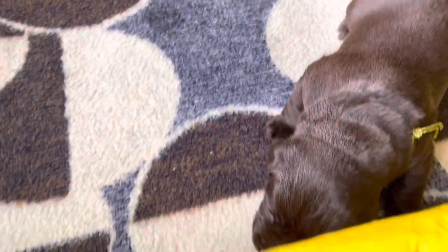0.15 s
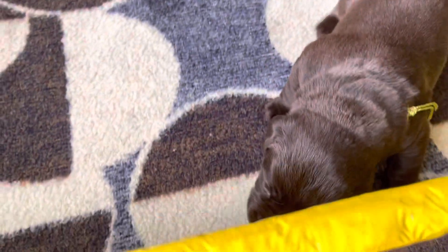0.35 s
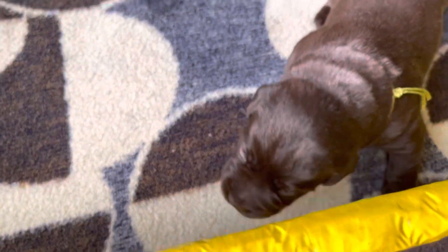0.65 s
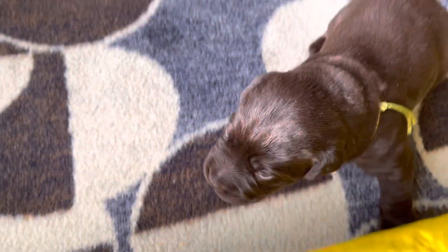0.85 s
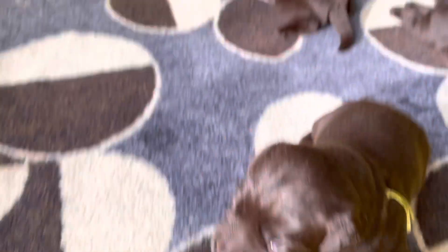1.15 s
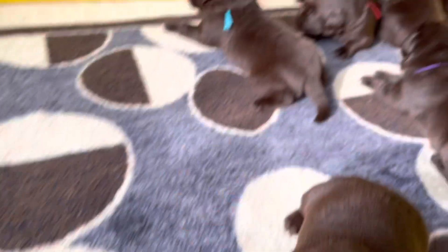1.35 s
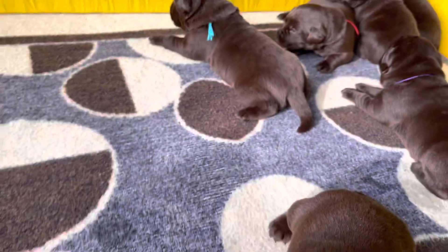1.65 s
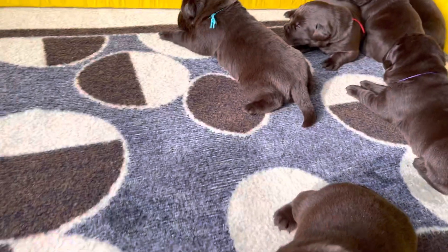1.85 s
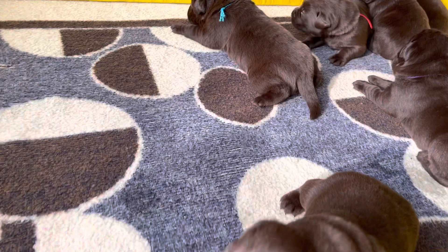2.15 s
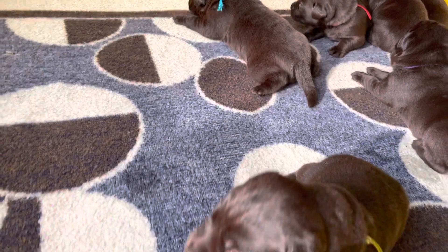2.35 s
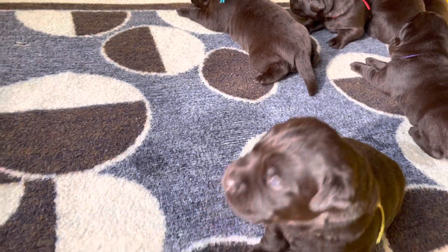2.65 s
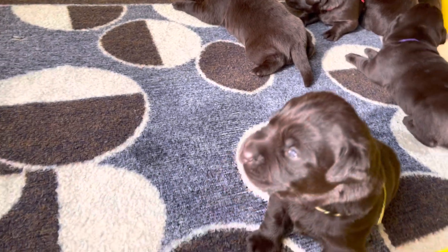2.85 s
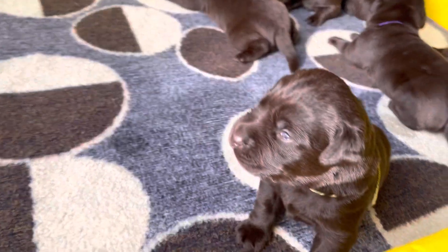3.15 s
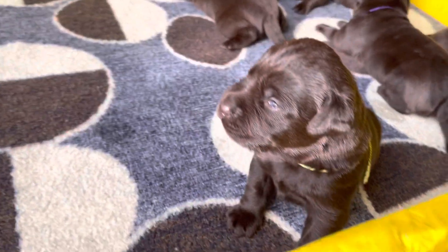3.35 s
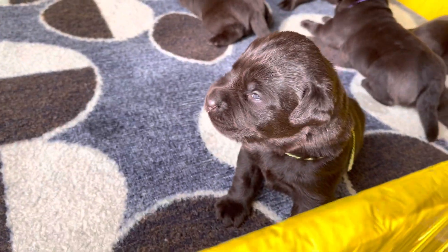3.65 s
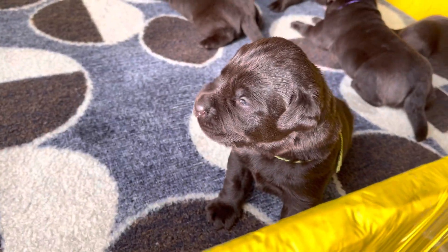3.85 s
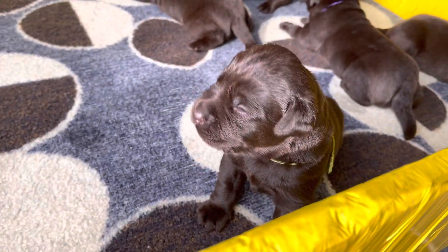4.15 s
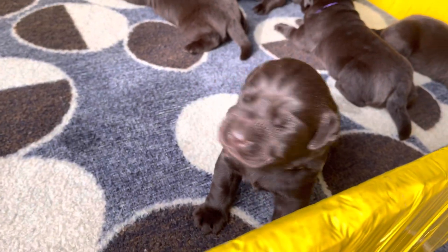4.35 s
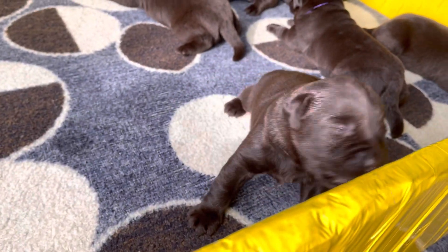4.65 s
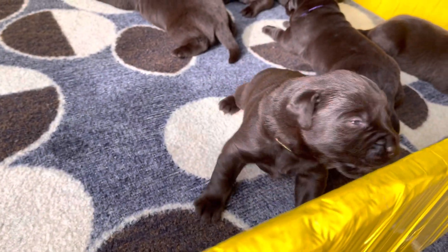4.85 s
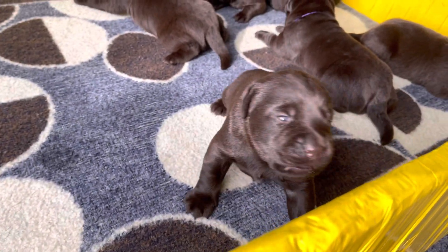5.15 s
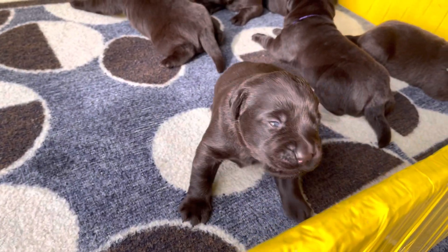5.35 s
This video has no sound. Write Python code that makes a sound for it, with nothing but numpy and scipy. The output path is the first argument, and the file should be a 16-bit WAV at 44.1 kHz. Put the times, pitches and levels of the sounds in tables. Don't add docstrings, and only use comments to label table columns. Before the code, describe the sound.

Very young puppies give trembling whines, short cries, a sharp bright yelp and arched squeaks, separated by soft creaky groans.

```python
import sys
import numpy as np
from scipy import signal
from scipy.fft import rfft, irfft
from scipy.io import wavfile
from scipy.ndimage import uniform_filter1d

SR = 44100
rng = np.random.default_rng(int(sys.argv[2]) if len(sys.argv) > 2 else 0)


def waveform_to_disk(signal):
    frames = np.transpose(np.atleast_2d(signal))
    scaled = np.clip(frames, -1, 1) * 32767
    samples = np.round(scaled).astype(np.int16)
    wavfile.write(sys.argv[1], SR, samples)


def gain_from_db(level_db):
    decades = np.asarray(level_db, float) / 20
    return 10 ** decades


N = 242991

# f/Hz, density/(dB per Hz)
ROOM_TONE = [(20, -48), (45, -11.5), (150, -16), (300, -20), (700, -28), (1300, -34), (2500, -35.5),
             (12000, -55.5)]
ROOM_TONE_DB = -71.5
# t/s, level/dB
RUMBLE = [
    (0.0, -91.5),
    (2.87, -60.5),
    (5.28, -87.5),
    (5.51, -73),
]

# t/s, f/Hz, level/dB, mouth opening as octave gain/dB
WHINES = [
    [(0.0, 1205, -47.5, -12.5), (0.03, 1298, -33, -36.5), (0.075, 1226, -27, -21.5)],
    [(0.18, 1176, -41, -9), (0.195, 1339, -30, -15.5), (0.3, 1288, -26.5, -22.5), (0.44, 1212, -25.5, -27),
     (0.55, 1159, -35, -9), (0.65, 1098, -34.5, -8.5), (0.675, 980, -44, 0.5), (0.72, 928, -50.5, 3)],
    [(2.862, 1545, -25.5, -4.5), (2.94, 1530, -24.5, -14.5), (2.995, 1394, -33, -6.5),
     (3.075, 1407, -31.5, -13), (3.14, 1489, -37.5, -20.5), (3.23, 1486, -39.5, -21.5),
     (3.36, 1349, -33.5, -11.5), (3.43, 1290, -38.5, -5.5), (3.485, 1188, -38, -9)],
    [(4.79, 608, -44, -8), (4.95, 565.3, -31.5, -11), (5.03, 535.3, -38, -2), (5.1, 577.4, -35.5, 0),
     (5.2, 599.3, -42, 2), (5.29, 608.5, -39, 4.5), (5.38, 593.7, -31.5, -5), (5.43, 533.4, -36.5, -6.5),
     (5.46, 448, -39.5, 0.5), (5.53, 480.4, -32.5, 2.4)],
]
# rate/Hz, depth/share of f, crest t/s, throb/dB, slowing/(Hz per s)
WHINE_TREMBLE = [(22.5, 0.0049, 0.047, -3.5, .1), (22.87, 0.028, .246, 2, 13.7),
                 (23.57, 0.028, 3.012, 2.5, 9.4), (22.41, 0.035, 5.292, -1.5, 8.6)]
WHINE_JITTER = [.006, .005, .008, .004]
# left-right/dB, upper partials/dB, twelfth over them/dB, dulling/(dB per s), air/dB
WHINE_VOICE = [(-4.8, -8, -2.3, 3.5, -8), (0.55, -7, -0.8, 27, -12.5), (0.5, -18.5, 2, 19.5, -2.5),
               (1, -33.5, 17.5, -14, -10)]
# f/Hz, gain/dB
MOUTH = [(1200, 8), (2400, 3), (3300, 0), (4700, -4.5), (5600, -0.5), (7500, 5.5), (9300, -4), (10200, 1),
         (11000, -9), (12300, -17)]
# f/Hz, gain/dB
NASAL = [(1200, 6), (2400, 1), (3100, -10), (4200, -9.5), (5000, -21.5), (5900, -5), (7000, 1), (9500, 2.5),
         (10500, 0), (12300, -27)]
# f/Hz, density/(dB per Hz)
RASP = [(300, -73.5), (1000, -22.5), (2200, -9), (2900, -39.5), (4500, -16.5), (6000, -26), (7200, -13),
        (9000, -8), (10200, -17.5), (11200, -10.5), (13000, -37)]
FLUTTER_DB, GRAIN_DB, GUST_DB = 1.2, .8, 2
TOP_HZ = 11284

# t/s, f/Hz, level/dB, mouth opening/dB
CRIES = [
    [(0.012, 978.4, -41.5, -15.5), (0.05, 1136, -31, -25.5), (0.058, 1058, -34.5, 10.5),
     (0.07, 1131, -31, 7), (0.1, 1130, -38, 11), (0.155, 865.5, -26.5, -15), (0.17, 783.5, -29, -22.5),
     (0.185, 843, -51, -9)],
    [(0.352, 1060, -50.5, 5.5), (0.385, 1225, -46.5, -0.5), (0.425, 1190, -36.5, -2.5),
     (0.445, 989, -43, 1.5), (0.46, 863.6, -29, -7), (0.535, 832, -24, -17.5), (0.55, 810, -74.5, 18.5)],
    [(2.757, 1078, -51, -32.5), (2.78, 995.5, -39, 9.5), (2.809, 1068, -38.5, 19.5), (2.813, 1170, -32, 14),
     (2.821, 1460, -23.5, 8), (2.85, 1495, -27, 6.5), (2.87, 1550, -32.5, -4)],
    [(2.865, 1550, -40, -16.5), (2.88, 1600, -18.5, -26.5), (2.92, 1559, -28, -22), (3.0, 1596, -35, -31.5),
     (3.1, 1583, -49.5, -18.5), (3.3, 1504, -38.5, -41)],
    [(4.29, 1813, -65, -32), (4.33, 1870, -40, -29.5), (4.35, 1995, -42, -34), (4.362, 1922, -39, -24)],
]
# left-right/dB, upper partials/dB, twelfth/dB, dulling/(dB per s), air/dB
CRY_VOICE = [(1.6, -17, -6, 6.7, -3.5), (1.9, -18.5, 4, 73, -7.5), (1.2, -4, 9, 75, -5),
             (7.5, -21.5, 1.5, 10.5, -4.5), (0.15, -19, 7.5, 12, -1.5)]
CRY_JITTER = [.007, .006, .005, .016, .006]

# t/s, f/Hz, level/dB, mouth opening/dB
YELPS = [
    [(0.058, 1053, -34.5, 14), (0.068, 1031, -33.5, 11), (0.082, 745.7, -31.5, 12.5),
     (0.095, 743.7, -29.5, 8.5), (0.118, 867.4, -40, 23), (0.132, 873, -41.5, 16), (0.142, 1030, -30.5, 17),
     (0.16, 1129, -35.5, 13.5), (0.167, 1007, -31, 15), (0.188, 1040, -50.5, 25)],
    [(4.535, 1439, -32.5, -18), (4.56, 1634, -22.5, -18.5), (4.6, 1658, -21, -11.5),
     (4.636, 1763, -23, -5.5), (4.639, 1839, -11.5, -10.5), (4.67, 1887, -15, -11.5),
     (4.725, 1824, -17, -22.5), (4.748, 1547, -25, -29), (4.765, 1119, -49.5, 6.5)],
]
# left-right/dB, upper partials/dB, twelfth/dB, dulling/(dB per s), air/dB
YELP_VOICE = [(-.4, -12.5, -7.5, 79.5, -7.5), (1.1, -23, -1, -34.5, -4.5)]
# f/Hz, width/Hz, gain/dB
YELP_RING = [(2240, 420, 26), (5300, 330, 22.5)]
YELP_JITTER = [.011, .003]

# crest t/s, half length/s, f/Hz, glide/(Hz per s), level/dB
GRUNTS = [(1.231, 0.02, 316.8, 897.5, -34), (1.4, 0.026, 298, -1700, -41.5),
          (2.178, 0.014, 1037, -3000, -41.5), (2.877, .025, 343.8, 31, -36.5),
          (3.268, .023, 939, 5796, -38), (3.491, 0.033, 449, 22, -40), (3.863, 0.058, 127, -350, -44.5),
          (3.981, .036, 259.5, 1009, -38.5), (4.348, .018, 325.6, -100, -36), (4.766, .05, 318, 795, -48),
          (4.941, 0.067, 295.2, -1100, -38), (0.343, .005, 700, 26, -45.5), (0.498, .004, 1900, 33.5, -34),
          (3.365, .006, 1300, 35, -21.5), (4.574, .004, 1000, 34, -44), (2.407, 0.0033, 2146, 30, -57),
          (0.502, 0.013, 325, 23, -66), (3.848, 0.0039, 790, 30, -48.5), (3.939, .005, 706, 31.5, -44.5),
          (0.084, .02, 310, 29.5, -48), (0.164, .02, 320, 31.5, -52)]
# left-right/dB, upper partials/dB, twelfth/dB, dulling/(dB per s), air/dB
GRUNT_VOICE = (1, -30.5, 14.5, -4, -4.5)
# octave f/Hz, gain/dB
GRUNT_MOUTH = [(250, -16.5), (550, -5.5), (900, -8), (1900, -27.5)]
GRUNT_RISE_DB, GRUNT_FALL_DB = 16, 21

# t/s, f/Hz, level/dB, mouth opening/dB
SLIDES = [
    [(0.685, 894, -51, 3.5), (0.695, 769, -32.5, 7), (0.725, 653.7, -34.5, 2.5), (0.775, 582.4, -44, -4.5),
     (0.795, 475.5, -45.5, 4), (0.845, 427, -43, 6.5), (0.865, 378.7, -38.5, 7.5), (0.97, 273, -39.5, 4),
     (0.995, 256.8, -51.5, -15)],
    [(3.478, 1213, -49, 8), (3.5, 842.5, -41, -15.5), (3.51, 784, -24.5, -17.5), (3.555, 770, -28, -24),
     (3.572, 663, -25, -20.5), (3.605, 621.3, -29, -15.5), (3.65, 503, -35, -8.5), (3.685, 410, -47.5, 15)],
    [(0.715, 981, -57.5, 11), (0.755, 943.6, -51, 8.5), (0.795, 980, -46, 9), (0.82, 884.6, -49, 14),
     (0.85, 768, -40, 3.5), (0.862, 790, -35, -5.5), (0.91, 752.7, -40.5, 6.7), (0.935, 644, -34, -7.5),
     (0.95, 575.3, -33, -16.5), (0.975, 557, -42.5, -5)],
    [(4.362, 957, -46.5, 2), (4.385, 661, -38.5, -9.5), (4.41, 490, -41.5, -7.5)],
]
# rate/Hz, depth/share of f, crest t/s, throb/dB, slowing/(Hz per s)
SLIDE_TREMBLE = [(19.9, 0.021, .75, 2.2, 0.086), (22.37, 0.034, 3.9, 1.2, 0.069),
                 (21.7, 0.0058, 1.7, 0.33, .1), (22.1, 0.0037, 5.4, 0.26, 0.11)]
# left-right/dB, upper partials/dB, twelfth/dB, dulling/(dB per s), air/dB
SLIDE_VOICE = [(2.3, -43, 27.5, 1.5, -6.5), (0.79, -32, 18, 1.6, -7), (2.3, -9.5, -3.5, 57, -20),
               (2.5, -31, 21, 1.5, -3)]

# start t/s, crest t/s, end t/s, level/dB, drop to end/dB
GROANS = [(1.211, 1.228, 1.209, -15, 16), (1.386, 1.393, 1.38, -55, 21), (1.913, 1.973, 2.0046, -32.5, 11),
          (2.178, 2.266, 2.3384, -32.5, 3.5), (2.549, 2.644, 2.877, -35.5, 4.5),
          (3.276, 3.49, 3.77, -41.5, 17), (3.893, 4.226, 4.466, -44.5, 10.5),
          (4.613, 4.632, 5.2, -44.5, 37.5), (0.922, 0.95, 0.97, -41.5, 6), (3.821, 3.845, 3.9, -51, 7)]
# f/Hz, left-right/dB
GROAN_VOICE = [(900, 10.5), (814, 3), (770, 1), (790, 1), (738, 1.1), (810, 2.5), (746, 3), (725, 3.5),
               (1086, 1), (606, 3)]
# f/Hz, width/Hz, level/dB
THROAT = [(150, 62, -14.5), (331, 133, -6), (490, 147, -2.5), (770, 217, 1.5), (1195, 150, -6.5),
          (1550, 99, -22), (2120, 100, -26)]
GROAN_RISE_DB, BREATH_RISE_DB, BRUSH_RISE_DB = 6, 9, 9

# start t/s, crest t/s, end t/s, level/dB, drop to end/dB
BREATH = [(1.211, 1.224, 1.27, -59, 16.5), (1.445, 1.466, 1.53, -62.5, 13.5),
          (1.716, 1.744, 1.756, -64.5, 26), (1.915, 1.975, 2.06, -62.5, 7), (2.172, 2.283, 2.38, -54.5, 39),
          (2.547, 2.56, 2.7, -62, -7.5), (3.287, 3.613, 3.73, -57.5, 21), (3.935, 3.97, 4.8, -70.5, -8.5),
          (4.352, 4.372, 4.2, -45.5, 1.5), (5.217, 5.3, 5.39, -69, 3)]
# f/Hz, density/(dB per Hz)
NOSE = [(2500, -77.5), (4400, -38), (5600, -21.5), (6800, -24.5), (8700, -12), (9700, -14.5),
        (10200, -17.5), (10800, -19), (13000, -57.5)]

# start t/s, crest t/s, end t/s, level/dB, drop to end/dB
BRUSHES = [
    (1.451, 1.484, 1.53, -59.5, 4.5),
    (1.954, 1.995, 2.06, -60, 6),
    (3.48, 3.495, 3.56, -54, 12),
    (4.366, 4.39, 4.88, -66, 10.5),
]
# f/Hz, density/(dB per Hz)
PILE = [(500, -40), (1100, -2.5), (2200, -6), (4300, -13), (5500, -13), (9000, -26), (12000, -45)]

# t/s, level/dB
SQUEAKS = [
    [(4.163, -44.5), (4.215, -36), (4.285, -30.5), (4.34, -34), (4.352, -44)],
    [(4.91, -43.5), (4.97, -14), (5.0, -13.5), (5.045, -15), (5.1, -23), (5.14, -23), (5.225, -36.5)],
    [(5.385, -38.5), (5.42, -25), (5.445, -19), (5.53, -19)],
]
# top f/Hz, collapse t/s, fall time/s
ARCHES = [(1902, 4.364, 0.0094), (1822, 5.232, .04), (1700, 5.7, 0.039)]
# left-right/dB, upper partials/dB, twelfth/dB, dulling/(dB per s), air/dB
SQUEAK_VOICE = [(5.4, -1, -5, 1.2, -7.5), (0.12, -14, 1.5, 2, -4), (3, -22.5, 1.5, 1.5, -4)]
# f/Hz, width/Hz, gain/dB
SQUEAK_RING = (5600, 800, 4.2)
RISE_SHARE, RISE_S, FALL_SHARE = .38, .045, 0.67
SHUT_DB, OPEN_DB = -27, 38.5

# f/Hz, left lead/rad
PORTS = [(0, 0.32), (780, 0.9), (1890, 0.66), (2300, 1.87), (3100, 1.4), (4740, 1.11), (5860, 0.86),
         (7410, 1.46), (8790, 1.2), (12000, -8)]


def colour(x, points):
    hz, db = np.transpose(points)
    f_hz = np.maximum(np.fft.rfftfreq(x.shape[-1], 1 / SR), 1)
    gain = gain_from_db(np.interp(np.log(f_hz), np.log(hz), db))
    y = irfft(rfft(x) * gain, x.shape[-1])
    return y / np.sqrt(np.mean(y ** 2))


def walk(n, rate_hz):
    k = max(int(SR / rate_hz), 1)
    steps = np.repeat(rng.standard_normal(n // k + 1), k)
    return 1.526 * uniform_filter1d(uniform_filter1d(steps, k), k)[:n]


def read(table, fade_s=0.00069, release_s=0.0026):
    s, *columns = np.transpose(table)
    start = int(s[0] * SR)
    t = np.arange(start, min(int(s[-1] * SR), N)) / SR
    fade = np.clip(np.minimum((t - s[0]) / fade_s, (s[-1] - t) / release_s), 0, 1)
    return start, t, fade, [np.interp(t, s, c) for c in columns]


def swell_of(row, rise_db):
    start_s, crest_s, end_s, db, drop_db = row
    return [(start_s, db - rise_db), (crest_s, db), (end_s, db - drop_db)]


def add(out, start, x, pan_db):
    pan = np.array([pan_db + 0 * x, -pan_db + 0 * x])
    out[:, start:start + len(x)] += x * gain_from_db(pan / 2)


def house():
    mid, side = rng.standard_normal((2, N))
    tone = colour(np.array([mid + 0.27 * side, mid - 0.46 * side]), ROOM_TONE)
    tone = tone * gain_from_db(ROOM_TONE_DB + 3 * walk(N, 4.5))
    s, db = np.transpose(RUMBLE)
    rumble_points = [(30, -49.5), (48, -6.5), (58, -8.5), (70, -7), (95, -40.0), (300, -83.0)]
    rumble = colour(rng.standard_normal(N), rumble_points)
    return tone + rumble * gain_from_db(np.interp(np.arange(N) / SR, s, db))


def call(out, air, table, voice, ring=(1000, 1000, 0), tremble=(22, .004, 0, .3, 0), jitter=0.0027,
         slope_db=0.52, press=0, tract=MOUTH):
    start, t, fade, (hz, first_db, mouth_db) = read(table)
    n = len(t)
    pan_db, upper_gain_db, third_gain_db, dull_db_per_s, air_db = voice
    rate_hz, depth, crest_s, throb_db, slowing = tremble
    ring_hz, ring_width_hz, ring_db = ring

    shake = np.cos(2 * np.pi * (rate_hz - slowing * (t - crest_s) / 2) * (t - crest_s))
    shake = shake * (1 + .3 * walk(n, 15)) * np.clip((t - t[0]) / .07, .3, 1)
    hz = uniform_filter1d(hz, size=260, mode="nearest")
    hz = hz * (1 + depth * shake + jitter * walk(n, 120))
    phase = 2 * np.pi * np.cumsum(hz) / SR

    second_db = first_db + mouth_db
    upper_db = first_db + .5 * mouth_db + upper_gain_db - dull_db_per_s * (t - t[0])
    upper_db = upper_db + press * (first_db - first_db.max())
    third_db = upper_db + third_gain_db + ring_db * np.exp(-((3 * hz - ring_hz) / ring_width_hz) ** 2)
    levels_db = [first_db, second_db, third_db]
    tract_hz, tract_db = np.transpose(tract)
    for k in range(4, 24):
        levels_db.append(upper_db + slope_db * (k - 4) + np.interp(k * hz, tract_hz, tract_db))

    swell = fade * gain_from_db(throb_db * shake + FLUTTER_DB * walk(n, 60))
    partials = np.zeros(n)
    for k, db in enumerate(levels_db):
        scatter_db = min(k, 3) * (0.85 * walk(n, 70) + GRAIN_DB * walk(n, 500))
        audible = hz * (k + 1) < TOP_HZ
        partials += np.sqrt(2) * gain_from_db(db + scatter_db) * audible * np.sin((k + 1) * phase + k * k)
    add(out, start, swell * partials, pan_db)

    puffs = (0.064 * gain_from_db(second_db) + 0.91 * gain_from_db(upper_db)) * (1 + 0.81 * np.cos(phase))
    add(air, start, swell * puffs * gain_from_db(air_db + GUST_DB * walk(n, 30)), pan_db)


def whines(out, air):
    for table, voice, tremble, jitter in zip(WHINES, WHINE_VOICE, WHINE_TREMBLE, WHINE_JITTER):
        tract = NASAL if table[0][1] < 700 else MOUTH
        call(out, air, table, voice, tremble=tremble, jitter=jitter, tract=tract)


def room(x, low_t60_s=.42, high_t60_s=.27, split_hz=2300, wet_db=-21, high_db=-4):
    t = np.arange(SR // 2) / SR
    noise = rng.standard_normal((3, len(t))) * np.clip(t / 0.033, 0, 1)
    noise = noise[0] + 1.1 * noise[1:]
    low = signal.sosfilt(signal.butter(2, split_hz, fs=SR, output="sos"), noise)
    low_tail = low * gain_from_db(-60 * t / low_t60_s)
    tail = low_tail + (noise - low) * gain_from_db(high_db - 60 * t / high_t60_s)
    tail = tail / np.sqrt(np.sum(low_tail * low_tail, axis=1, keepdims=True))
    return gain_from_db(wet_db) * signal.fftconvolve(x, tail, axes=1)[:, :N]


def cries(out, air):
    for table, voice, jitter in zip(CRIES, CRY_VOICE, CRY_JITTER):
        call(out, air, table, voice, jitter=jitter)


def yelps(out, air):
    for table, voice, ring, jitter in zip(YELPS, YELP_VOICE, YELP_RING, YELP_JITTER):
        call(out, air, table, voice, ring, jitter=jitter, press=.3)


def grunt(crest_s, half_s, hz, glide_hz_per_s, db):
    u = np.array([-1, -.5, 0, .5, 1])
    mouth_db = np.interp(2 * hz, *np.transpose(GRUNT_MOUTH))
    level_db = db - np.where(u < 0, GRUNT_RISE_DB, GRUNT_FALL_DB) * np.abs(u) ** 1.1
    return np.transpose([crest_s + half_s * u, hz + glide_hz_per_s * half_s * u, level_db, mouth_db + 0 * u])


def grunts(out, air):
    for row in GRUNTS:
        call(out, air, grunt(*row), GRUNT_VOICE, jitter=.012, slope_db=-2.5)


def slides(out, air):
    for table, voice, tremble in zip(SLIDES, SLIDE_VOICE, SLIDE_TREMBLE):
        call(out, air, table, voice, tremble=tremble, jitter=0.0037, tract=NASAL)


def creak(rate_hz=190, scatter=0.3, size_db=3.0):
    chance = rng.standard_normal((N // 40, 2))
    at = np.cumsum(SR / rate_hz * np.exp(scatter * chance[:, 0])).astype(int)
    flaps = np.zeros(N)
    flaps[at[at < N]] = gain_from_db(size_db * chance[at < N, 1])
    return flaps / np.sqrt(np.mean(flaps ** 2))


def groans(flaps):
    push = flaps + .65 * rng.standard_normal(N)
    ring, out = np.zeros(N), np.zeros((2, N))
    for hz, width_hz, db in THROAT:
        b, a = signal.iirpeak(hz, hz / width_hz, fs=SR)
        ring += gain_from_db(db) * signal.lfilter(b, a, signal.lfilter(b, a, push))
    ring = signal.sosfilt(signal.butter(12, 2400, fs=SR, output="sos"), ring)
    ring = ring / np.sqrt(np.mean(ring ** 2))
    for row, (hz, pan_db) in zip(GROANS, GROAN_VOICE):
        start, t, fade, (db,) = read(swell_of(row, GROAN_RISE_DB), fade_s=0.011, release_s=0.033)
        n = len(t)
        wobbly_hz = hz * (1 + .035 * walk(n, 250) + 0.039 * walk(n, 25))
        phase = 2 * np.pi * np.cumsum(wobbly_hz) / SR
        tone = gain_from_db(0.5 + 5.9 * walk(n, 120)) * (np.sin(phase) + 0.17 * np.sin(2 * phase))
        add(out, start, fade * gain_from_db(db) * (tone + 1.007 * ring[start:start + n]), pan_db)
    return out


def breath(flaps):
    puffs = signal.lfilter([1], [1, -.99], flaps)
    hiss = colour(rng.standard_normal(N) * (1 + 0.15 * puffs), NOSE)
    out = np.zeros((2, N))
    for row in BREATH:
        start, t, fade, (db,) = read(swell_of(row, BREATH_RISE_DB), fade_s=0.015, release_s=0.044)
        add(out, start, fade * gain_from_db(db + 2.0) * hiss[start:start + len(t)], .4)
    return out


def carpet():
    scuff = colour(rng.standard_normal(N) * gain_from_db(3.9 * walk(N, 300)), PILE)
    out = np.zeros((2, N))
    for row in BRUSHES:
        start, t, fade, (db,) = read(swell_of(row, BRUSH_RISE_DB), fade_s=.01, release_s=.03)
        add(out, start, fade * gain_from_db(db) * scuff[start:start + len(t)], 1.5)
    return out


def arch(effort, top_hz, collapse_s, fall_s):
    s, db = np.transpose(effort)
    t = np.arange(s[0], s[-1], 1 / 400)
    below = RISE_SHARE * np.exp(-((t - s[0]) / RISE_S) ** 1.5)
    below = below + FALL_SHARE * np.exp((t - collapse_s) / fall_s)
    return np.transpose([t, top_hz * (1 - below), np.interp(t, s, db), SHUT_DB + OPEN_DB * below])


def squeaks(out, air):
    for effort, shape, voice in zip(SQUEAKS, ARCHES, SQUEAK_VOICE):
        call(out, air, arch(effort, *shape), voice, SQUEAK_RING, press=0.29)


def scene():
    calls, air = np.zeros((2, N)), np.zeros((2, N))
    for source in (whines, cries, yelps, grunts, slides, squeaks):
        source(calls, air)
    rasp = gain_from_db(3.5) * air * colour(rng.standard_normal(N), RASP)
    flaps = creak()
    litter = calls + rasp + groans(flaps) + breath(flaps) + carpet()
    litter = signal.sosfilt(signal.butter(4, 105, "high", fs=SR, output="sos"), litter)
    return litter + room(litter) + house()


def top_cut(x):
    return signal.sosfilt(signal.butter(12, 12390, fs=SR, output="sos"), x)


def record(dry):
    hz, lead_rad = np.transpose(PORTS)
    turn = np.exp(.5j * np.interp(np.fft.rfftfreq(N, 1 / SR), hz, lead_rad))
    mix = irfft(rfft(dry) * np.array([turn, turn.conj()]), N)
    mix = signal.sosfilt(signal.butter(6, TOP_HZ, fs=SR, output="sos"), mix)
    return top_cut(mix)


dry = scene()
out = record(dry)
waveform_to_disk(out)
```